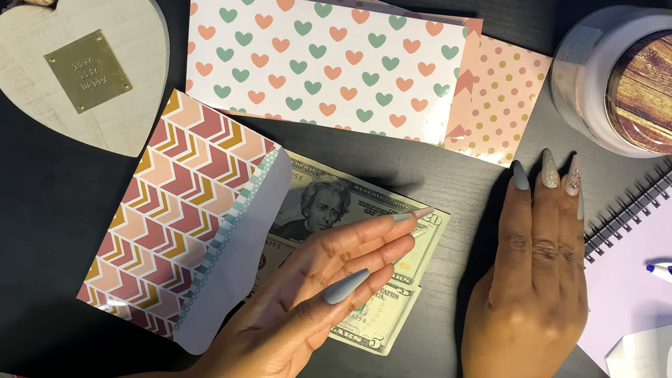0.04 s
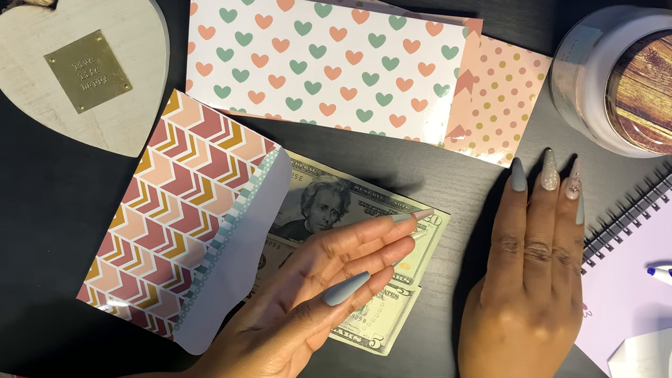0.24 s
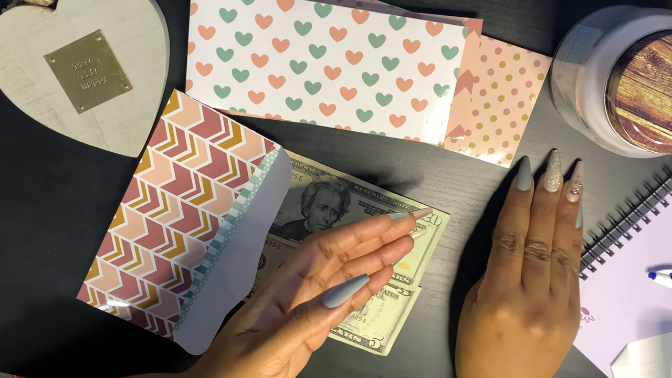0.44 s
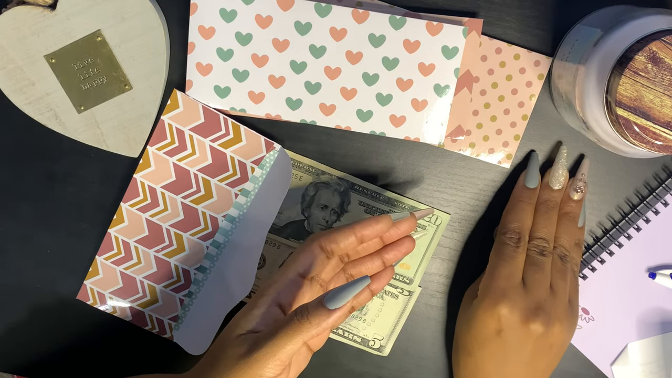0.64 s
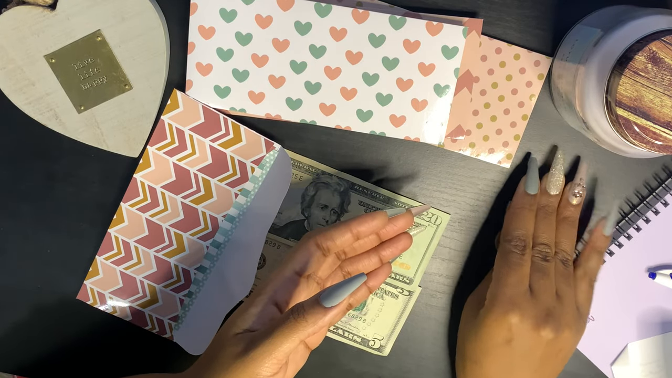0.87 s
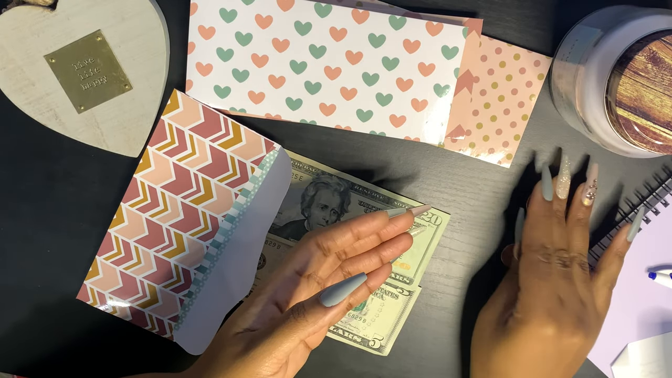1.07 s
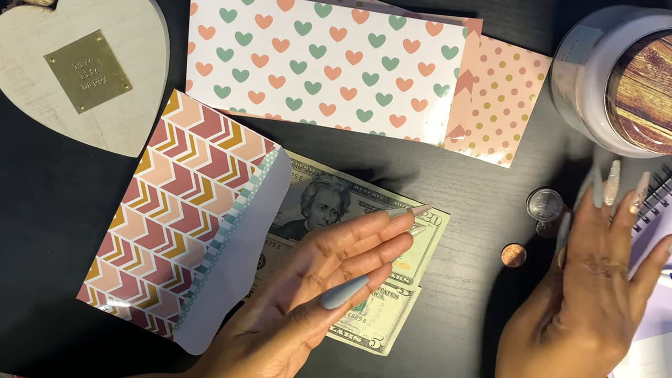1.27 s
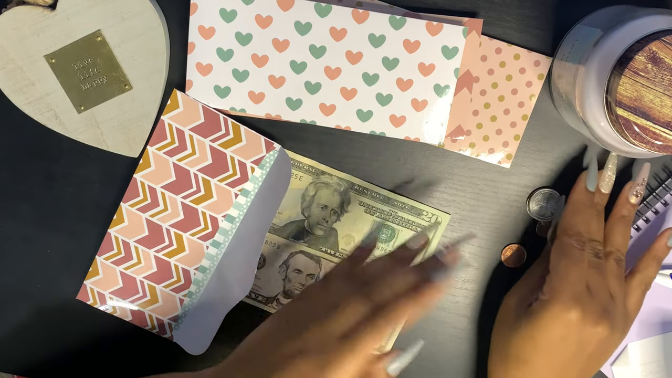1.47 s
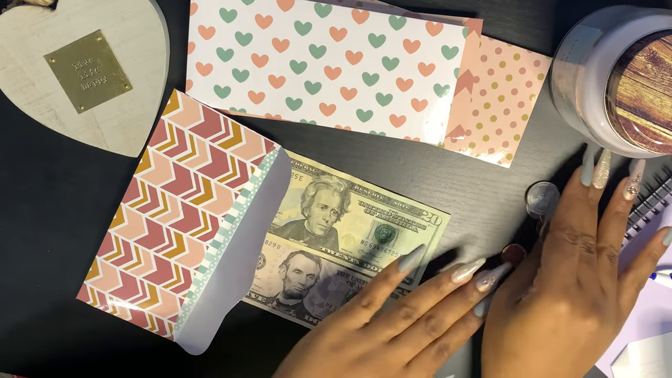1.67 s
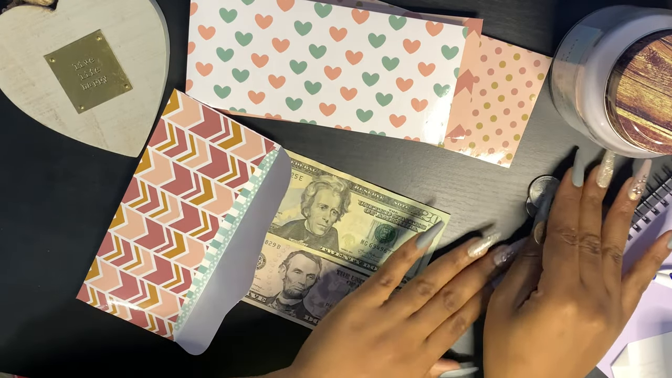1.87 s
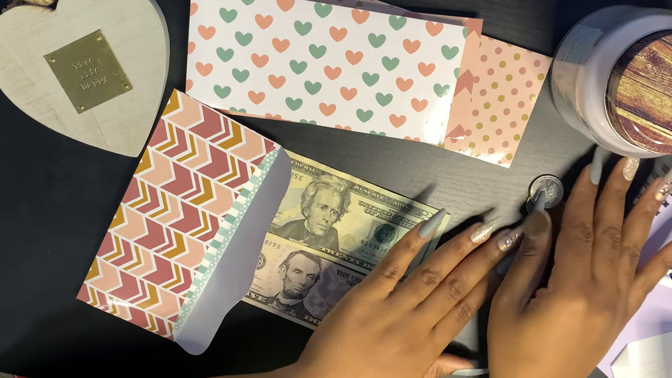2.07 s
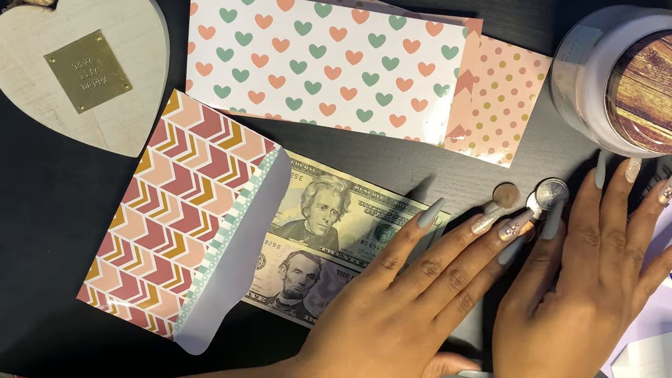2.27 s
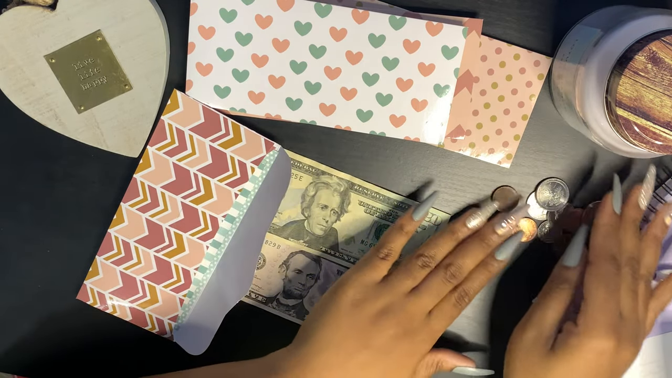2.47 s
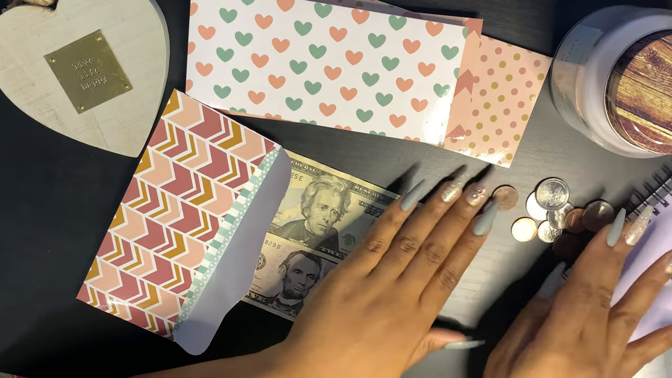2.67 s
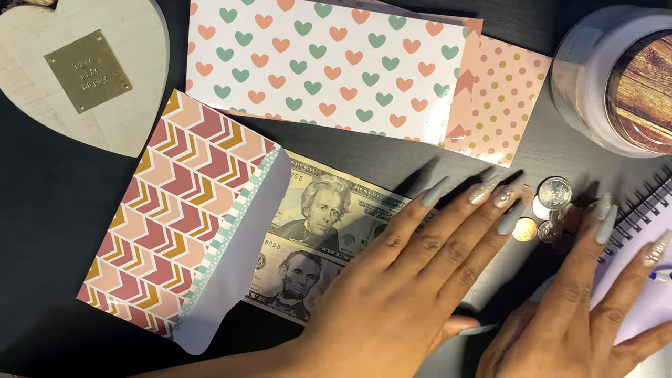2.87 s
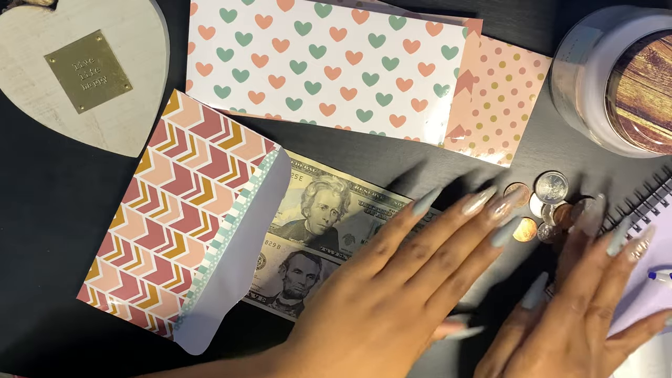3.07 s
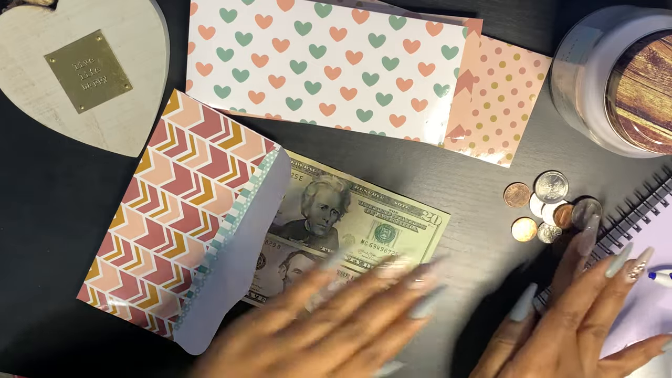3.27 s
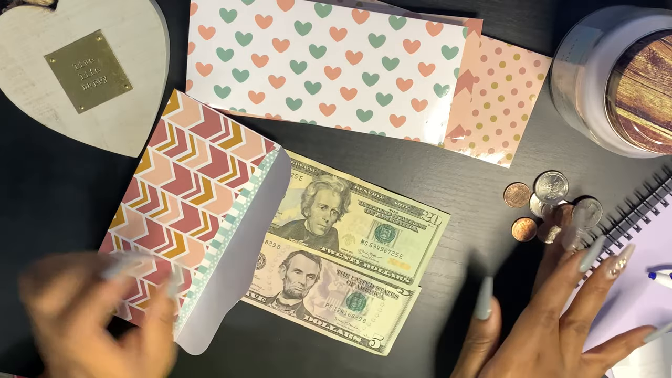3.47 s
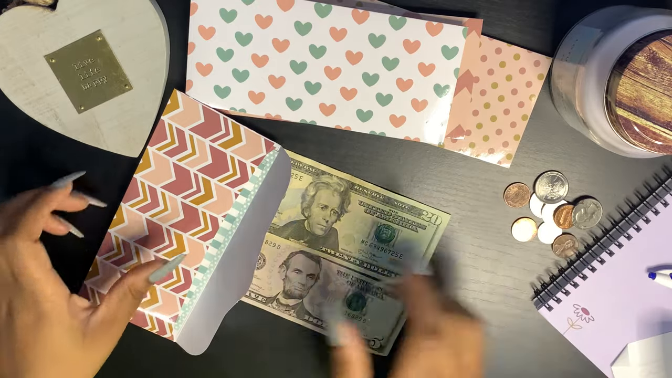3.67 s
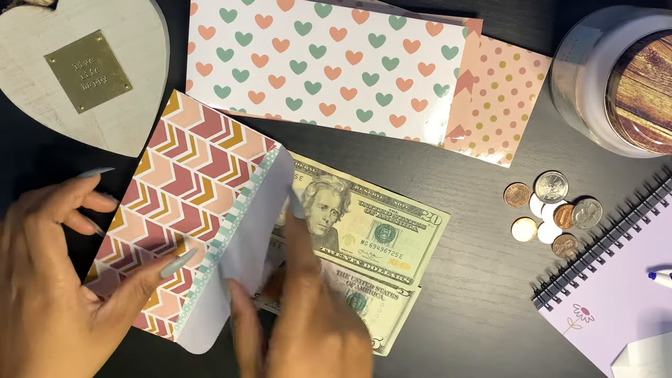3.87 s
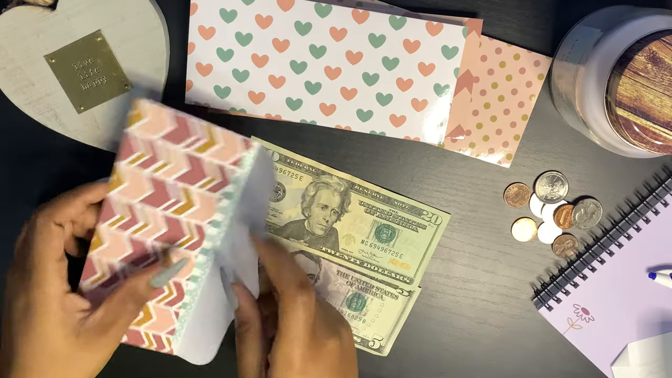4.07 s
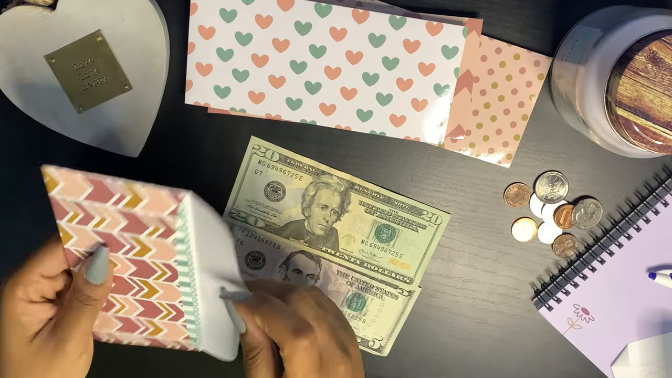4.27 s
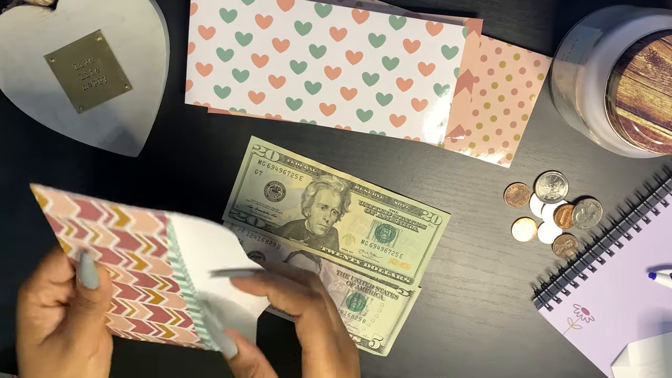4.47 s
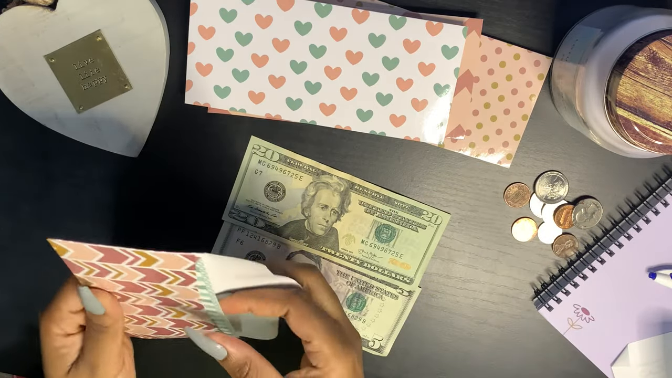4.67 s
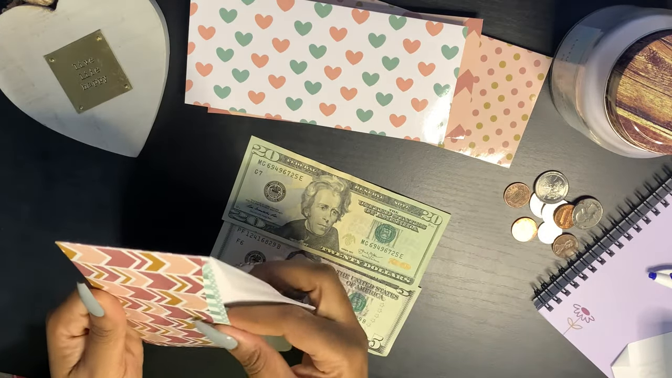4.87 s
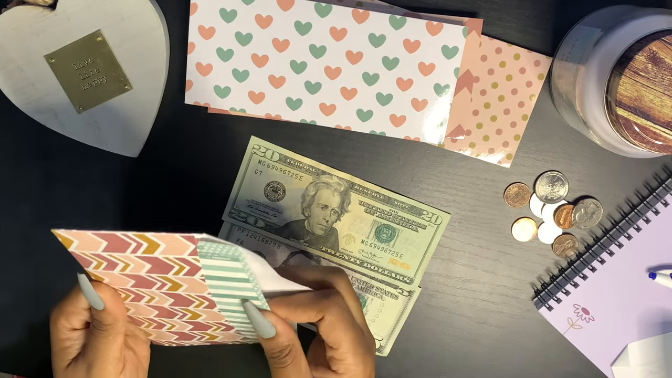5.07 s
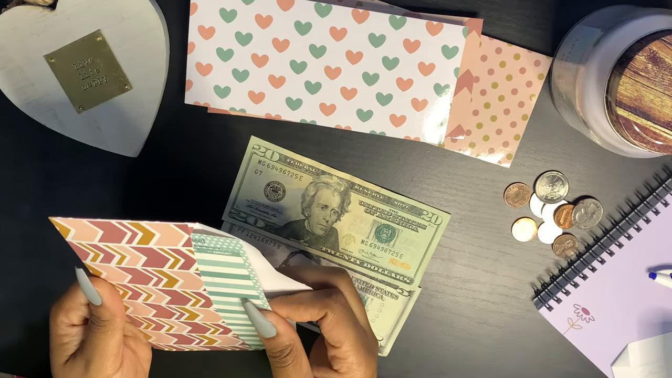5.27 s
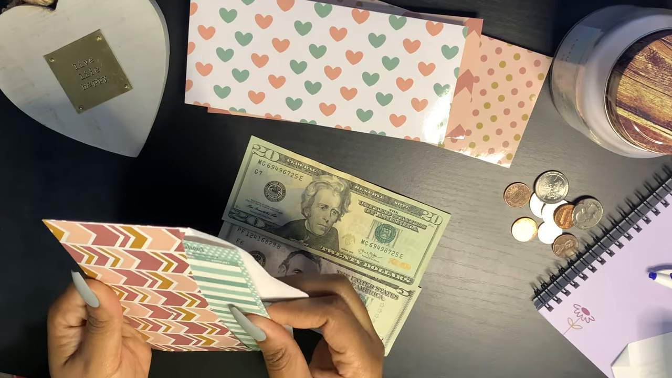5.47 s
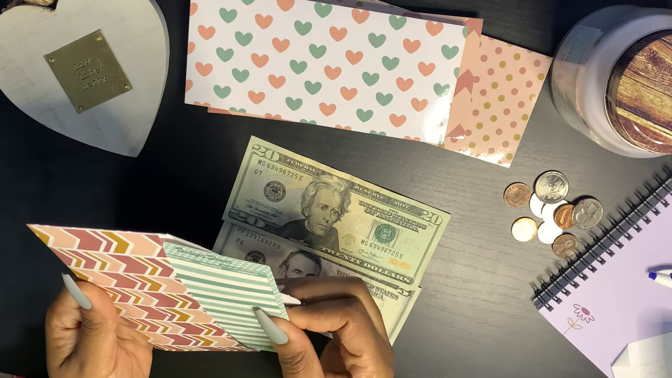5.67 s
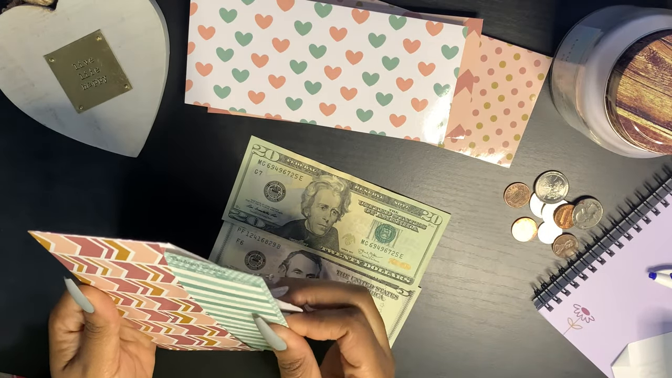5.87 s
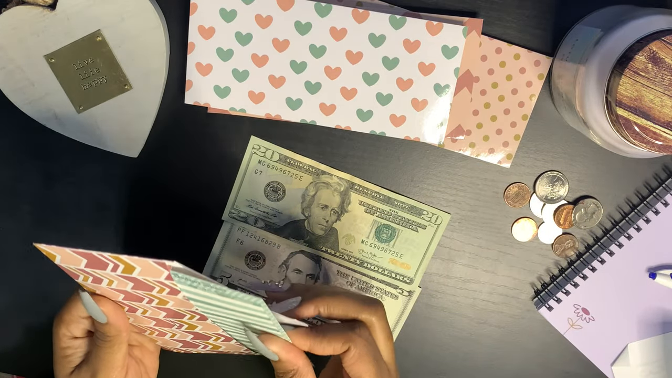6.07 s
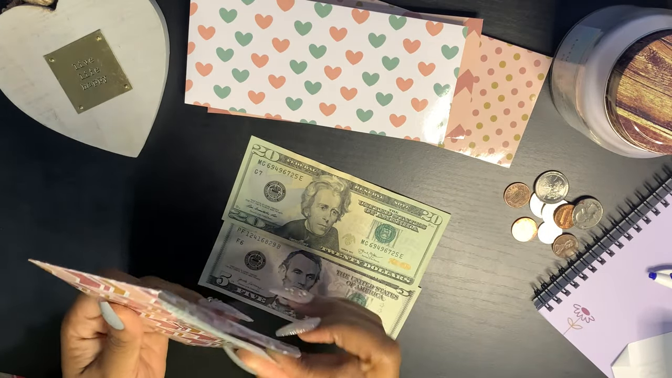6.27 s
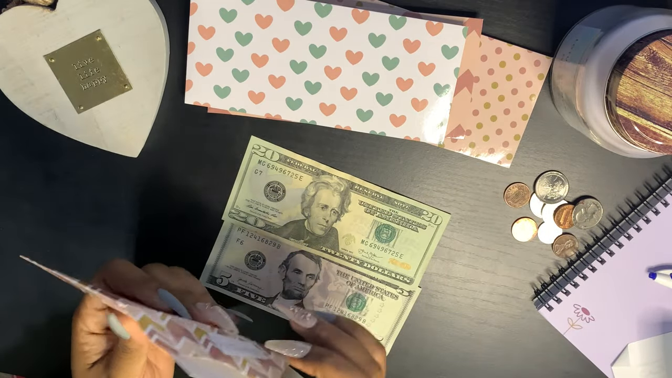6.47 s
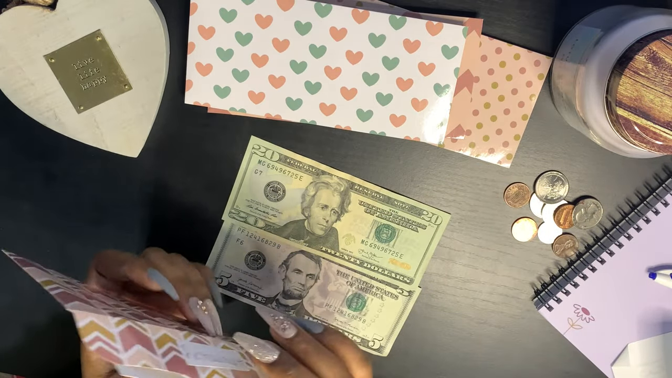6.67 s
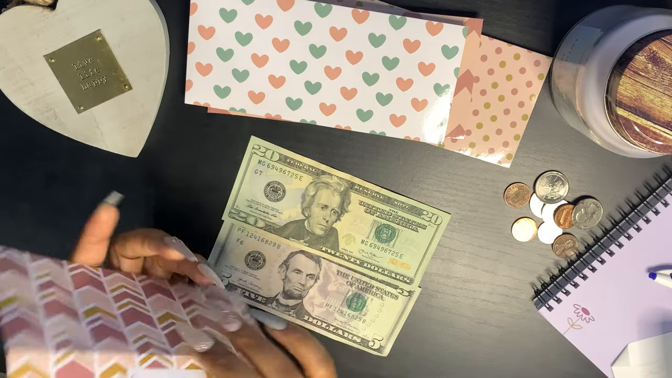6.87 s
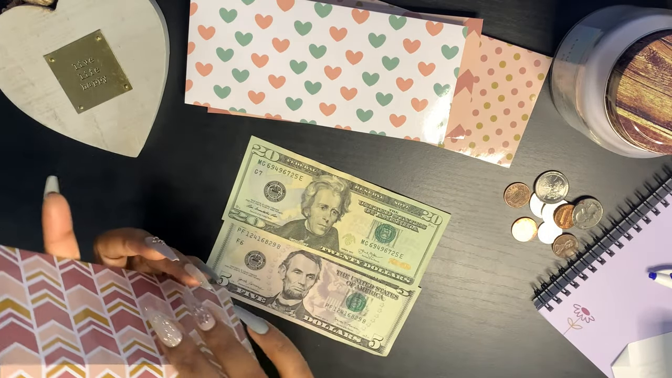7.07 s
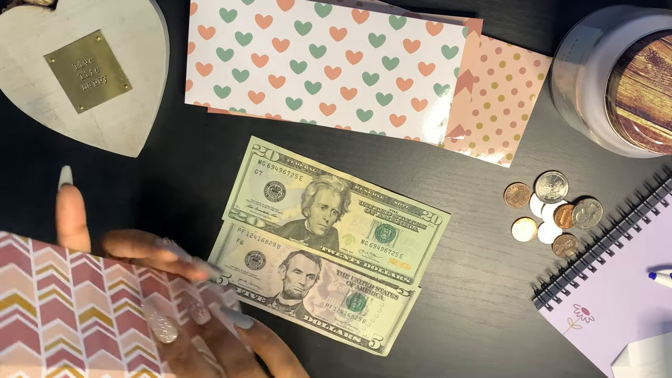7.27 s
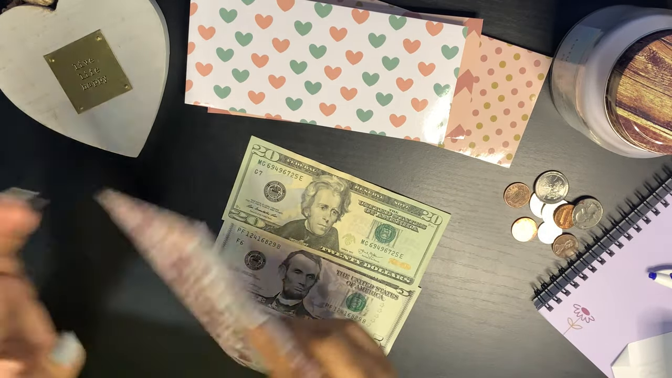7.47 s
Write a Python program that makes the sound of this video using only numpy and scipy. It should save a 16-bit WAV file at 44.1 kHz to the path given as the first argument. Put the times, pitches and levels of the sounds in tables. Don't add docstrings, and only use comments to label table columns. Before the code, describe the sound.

Close above a tabletop in a small quiet room, coins are slapped down with hard woody cracks, then gathered with bright jingling. Flat fingers shove the heap in dull, ratcheting scrapes. After a last small jingle and a short pause, a paper envelope is picked up with a thump, creased, flexed and scratched by a nail, with faint room rumble and hum beneath.

```python
import sys
import numpy as np
from scipy import signal
from scipy.fft import rfft, irfft, next_fast_len
from scipy.io import wavfile
from scipy.ndimage import uniform_filter1d

SR = 44100
rng = np.random.default_rng(int(sys.argv[2]) if len(sys.argv) > 2 else 0)


def decibels_to_gain(level_db):
    exponent = np.asarray(level_db, float) / 20
    return 10 ** exponent


def file_out(sig):
    cols = np.atleast_2d(sig).T
    lim = np.clip(cols, -1, 1)
    pcm = np.round(lim * 32767).astype(np.int16)
    wavfile.write(sys.argv[1], SR, pcm)


N = 332073

# start_s, end_s
HELD_S = (2.235, 2.76)
# start_s, swell_s, scrape_db, fade_db_per_s, metal_db (above the scrape)
SLIDES = [(.236, 0.019, -50, 699.5, 0), (2.754, 0.0025, -46.5, 301, -3), (.193, 0.0026, -60, 168.5, -12),
          (.265, 0.005, -33.5, 225, -19), (.455, 0.0043, -32.5, 268.5, -9.5),
          (.442, 0.0061, -53.5, 599.5, -10.5), (.69, 0.058, -62, 284, -41), (.836, 0.05, -40, 305, 5.5),
          (.92, 0.12, -50, 181, -12), (1.08, 0.086, -57, 327, -7), (1.4125, 0.0036, -50.5, 142.5, 4),
          (1.527, 0.002, -50.5, 80.5, -1), (1.66, 0.067, -46, 60.5, 0), (1.74, 0.12, -45.5, 152, 11),
          (2.0175, 0.013, -47, 165, 5), (2.096, 0.0032, -48.5, 198, -8.5), (2.128, 0.028, -46, 141, 0.5),
          (2.889, 0.0037, -46, 101, -3.5), (2.96, 0.071, -55.5, 266.5, 7.5)]
# start_s, swell_s, scrape_db, fade_db_per_s, metal_db (above the scrape)
SHUFFLES = [
    (2.24, 0.13, -53.5, 60, 0.33),
    (2.358, 0.3, -51.5, 60, 0.27),
]


def ring(x, modes, low_hz=20, high_hz=60000):
    hz = np.fft.rfftfreq(next_fast_len(N), 1 / SR) + 1e-3
    shape = 0
    for k, (mode_hz, width_hz, db) in enumerate(modes):
        shape = shape + (-1) ** k * decibels_to_gain(db) / (1 + 1j * (hz - mode_hz * mode_hz / hz) / width_hz)
    shape /= (1 + 1j * hz / high_hz) ** 6 * (1 - 1j * low_hz / hz) ** 4
    shape /= np.sqrt(np.mean(abs(shape) ** 2))
    return irfft(rfft(x, next_fast_len(N)) * shape)[..., :N]


def grit(spread_db, hold_ms, clump_db, clump_ms):
    hold = max(int(hold_ms * SR / 1000), 1)
    clump = max(int(clump_ms * SR / 1000), 1)
    contacts = np.minimum(rng.exponential(size=N + 1)[:N // hold + 1], 2.6)
    size = decibels_to_gain(spread_db * np.repeat(contacts, hold)[:N])
    crowding = rng.standard_normal(N // 100)[:N // clump + 1]
    crowding = uniform_filter1d(np.repeat(crowding, clump)[:N], clump)
    size = uniform_filter1d(size, hold) * decibels_to_gain(clump_db * crowding)
    return rng.standard_normal((2, N)) * size / np.sqrt(np.mean(size ** 2))


def impact_noise():
    return np.sign(rng.standard_normal((2, N)))


def pushes(times, peak_db, contact_ms):
    force, t = np.zeros(N + SR), np.arange(SR // 10) / SR
    for s, db, ms in zip(times, peak_db, contact_ms):
        u = t / (np.clip(ms, .2, 12) / 1000)
        at = int(s * SR)
        force[at:at + len(t)] += decibels_to_gain(db) * (u * np.exp(1 - u)) ** 2
    return force[:N]


def strokes(rows, db=0., share=0., faster=1.):
    gain, t = np.zeros(N + SR), np.arange(SR) / SR
    for s, swell_s, level_db, fade, *colour_db in rows:
        rise = np.minimum(t / swell_s, 1)
        fall_db = faster * fade * np.maximum(t - swell_s, 0)
        at = int(s * SR)
        gain[at:at + SR] += rise * decibels_to_gain(level_db + db + share * sum(colour_db) - fall_db)
    return gain[:N]


def tones(times, peak_db, hz, t60):
    out, t = np.zeros((2, N + SR)), np.arange(SR // 4) / SR
    onset = 1 - np.exp(-t / 0.00033)
    for s, db, f, fade_s in zip(times, peak_db, hz, t60):
        ringing = np.sin(2 * np.pi * f * t + [[0], [np.pi / 2]]) * decibels_to_gain(-60 * t / fade_s) * onset
        at = int(s * SR)
        out[:, at:at + len(t)] += decibels_to_gain(db) * ringing
    return out[:, :N]


def pings(gain, rate, low_hz, high_hz, t60):
    out, t = np.zeros((2, N + SR)), np.arange(SR // 50) / SR
    fade = decibels_to_gain(-60 * t / t60) * (1 - np.exp(-t / 0.00015))
    for place, pitch, size, phase in rng.random((4000, 4))[:int(rate * N / SR)]:
        at = int(place * N)
        hz = low_hz * (high_hz / low_hz) ** pitch
        wave = np.sin(2 * np.pi * (hz * t + phase * np.array([[0], [1]])))
        out[:, at:at + len(t)] += gain[at] * (0.88 + size) * fade * wave
    return out[:, :N] / np.sqrt(rate * t60 / 14)


def waver(x, chance):
    rock_ms, rocks_per_s = .25, 40
    k = int(SR / rocks_per_s)
    path = uniform_filter1d(uniform_filter1d(chance, k), k)
    place = np.arange(N) + path / np.std(path) * rock_ms * SR / 1000
    return np.array([np.interp(place, np.arange(N), row) for row in x])


def air():
    # pitch_hz, level_db (per Hz)
    rumble_curve = [(25, -19), (43, -12), (124, -6.5), (334, -24.5), (1440, -30), (7000, -47), (9100, -87),
                    (15400, -120)]
    # pitch_hz, level_db (rms)
    mains_lines = [(60, -80), (120, -82)]
    # pitch_hz, width_hz, level_db (rms)
    fan_whine = [(1480, 21, -88)]
    rumble_db, rumble_wander_db, hiss_db = -71, 1.6, -85.5
    hz, t = np.fft.rfftfreq(N, 1 / SR) + 1, np.arange(N) / SR
    curve_hz, curve_db = np.transpose(rumble_curve)
    colour = decibels_to_gain(np.interp(np.log(hz), np.log(curve_hz), curve_db))
    rumble = irfft(rfft(rng.standard_normal((2, N))) * colour, N)
    rumble /= np.sqrt(np.mean(rumble ** 2))
    hold = 4410
    wander = uniform_filter1d(np.repeat(rng.standard_normal(N // hold + 1), hold)[:N], hold)
    hum = 0
    for line_hz, db in mains_lines:
        hum = hum + decibels_to_gain(db + 6.0 + 1.7 * wander) * np.sin(2 * np.pi * line_hz * t)
    hum += decibels_to_gain(fan_whine[0][2] + 4.0 * wander[::-1]) * ring(rng.standard_normal(N), fan_whine)
    hiss = ring(rng.standard_normal((2, N)), [(8100, 3500, 0)], high_hz=30000)
    hiss *= decibels_to_gain(hiss_db + 1.8 * wander[::-1])
    return rumble * decibels_to_gain(rumble_db + rumble_wander_db * wander) + hum * [[1], [0]] + hiss


def room(x):
    # pitch_hz, t60_s, level_db
    reverb_bands = [(300, 0.3, -24), (1300, 0.18, -8.5), (3400, 0.11, -7.5), (11000, 0.28, -29.5)]
    t = np.arange(SR // 2) / SR
    noise = rng.standard_normal((2, N))
    tail = 0
    for hz, t60, db in reverb_bands:
        decay = decibels_to_gain(-60 * t / t60) * (1 - np.exp(-t / 0.0021))
        decay /= np.sqrt(np.sum(decay ** 2))
        band = ring(noise, [(hz, hz, 0)])[:, :len(t)] * np.sqrt(hz / 9000)
        tail = tail + decibels_to_gain(db) * band * decay
    return signal.fftconvolve(x, tail, axes=1)[:, :N]


def nail_draws(rub):
    # start_s, swell_s, level_db, fade_db_per_s, squeak_db (above the scrape)
    draw_strokes = [
        (6.055, .02, -72, 17, -19.5),
        (6.4, 0.046, -53.5, 153, -11.5),
        (6.48, 0.017, -59.5, 120, 0.5),
        (6.56, 0.11, -55.5, 200, -7),
        (6.7, 0.061, -56, 304, 0),
        (7.116, 0.0037, -57, 200, -5),
    ]
    # pitch_hz, width_hz, level_db
    scrape_modes = [(2867, 164, 0), (1600, 460, -15.5)]
    squeak_modes = [(5550, 1200, -0.076), (6760, 180, -0.29), (4120, 1300, -1.4)]
    scrape = ring(strokes(draw_strokes) * rub, scrape_modes, low_hz=494)
    return scrape + ring(strokes(draw_strokes, share=0.92) * rub, squeak_modes, low_hz=2000)


def thumps_and_pops():
    # start_s, peak_db, pitch_hz, t60_s
    pocket_thumps = [
        (3.73, -51, 220, 0.072),
        (3.776, -51, 235, 0.17),
        (3.953, -35.5, 300, 0.12),
        (3.979, -53, 300, 0.046),
        (6.059, -44, 424, 0.059),
        (6.19, -42, 400, 0.094),
    ]
    # start_s, peak_db, pitch_hz, t60_s
    wrist_knocks = [
        (2.632, -48.5, 110.5, 0.26),
        (7.266, -46, 105, 0.11),
    ]
    # start_s, peak_db, pitch_hz, t60_s
    fold_pops = [(4.097, -49, 4520, .015), (4.213, -42, 4500, .01), (4.142, -50, 1410, 0.036),
                 (4.148, -47, 1550, 0.032), (4.174, -53, 450, 0.026), (4.198, -49, 7160, .015),
                 (4.2268, -45, 520, 0.037), (4.2425, -38, 634, 0.011), (4.258, -37, 1700, 0.0089),
                 (4.264, -43, 523, 0.011), (4.345, -53, 923, 0.017), (4.889, -59, 830, 0.039),
                 (5.04, -50, 2020, 0.01), (6.193, -50.5, 1500, 0.021), (6.436, -48, 2870, 0.024),
                 (6.446, -52, 2880, 0.018), (6.654, -45.5, 1720, 0.056), (7.056, -49, 1400, 0.033),
                 (7.116, -39.5, 4420, 0.024), (7.141, -45, 1500, 0.053), (7.166, -41, 3470, .015),
                 (7.221, -44, 1520, 0.025), (7.261, -30, 3900, 0.0084), (7.263, -39, 220, 0.035),
                 (7.473, -41, 387, 0.04)]
    return tones(*np.transpose(pocket_thumps + wrist_knocks + fold_pops))


def paper_snaps():
    # start_s, peak_db, thud_db (above the peak), pitch_hz
    nail_taps = [(3.95, -24.5, 4, 1770), (4.001, -47, -25, 2600), (4.0119, -34, -26, 1600),
                 (4.3878, -59, 12, 1500), (5.865, -58, 10, 2400), (5.964, -68, -21, 3140),
                 (6.0532, -42.5, -8, 2900), (6.188, -53.5, 27.5, 1300), (6.283, -56, -24, 2770),
                 (6.759, -34, 4.5, 1480), (6.8494, -41, 8, 1480), (7.093, -46, 9, 1480),
                 (7.1671, -37.5, -29, 1100), (7.261, -29, -8, 4350), (7.482, -40, 13, 1690)]
    # start_s, peak_db, sizzle_db (above the peak), pitch_hz
    crisp_creases = [(3.7232, -57, -9, 3050), (3.7669, -74.5, 19, 1175), (3.8078, -50, -2, 2300),
                     (3.9104, -45.5, -12, 1800), (3.9958, -33.5, -21, 2620), (4.0424, -44, -15, 1630),
                     (4.1982, -45.5, -10, 1570), (4.2138, -42.5, -13, 1340), (4.2267, -39.5, -5, 2560),
                     (4.3445, -69, -11, 2000), (5.036, -39.5, -25, 2514), (5.435, -63, -6, 4800),
                     (5.543, -50, -16, 2900), (7.2607, -37, -5.5, 5400), (4.5854, -52, 6, 1380),
                     (4.724, -48, -9, 1280), (6.505, -38.5, -7, 2935), (7.471, -38, -7, 2350)]
    tap_sizzle_db, crease_thud_db = -65, -17
    snaps = [(s, db, thud_db, tap_sizzle_db, hz) for s, db, thud_db, hz in nail_taps]
    snaps += [(s, db, crease_thud_db, sizzle_db, hz) for s, db, sizzle_db, hz in crisp_creases]
    s, db, thud_db, sizzle_db, hz = np.transpose(snaps)
    ms = 0.85 * decibels_to_gain(-0.45 * (db + 50.5))
    return s, db, thud_db, sizzle_db, hz, ms


def paper():
    # start_s, swell_s, rustle_db, fade_db_per_s, sizzle_db (above the rustle)
    paper_rubs = [(3.725, 0.052, -69, 156.5, 1), (3.804, 0.0087, -61, 28, -7),
                  (3.945, 0.0046, -60, 80, -37), (4.135, 0.11, -60.5, 168, -7),
                  (4.425, 0.027, -62.5, 113, 0), (4.48, 0.21, -60, 291, -9.5), (4.714, 0.012, -55, 362, 3),
                  (4.84, 0.083, -58.5, 96.5, 1), (4.95, 0.05, -66.5, 298, 7.5),
                  (5.05, 0.096, -76, 349.5, -2.5), (5.36, 0.07, -71.5, 105, -5),
                  (5.47, 0.11, -59, 224, -6.5), (5.78, 0.11, -73, 17, -8), (6.05, 0.31, -72.5, 26, -15),
                  (6.385, 0.067, -55, 66, -11), (6.5, 0.2, -60, 296, -2), (6.7, 0.049, -48, 248, -1),
                  (6.826, 0.027, -54.5, 92, -12.5), (7.02, 0.031, -60.5, 95, -36.5),
                  (7.09, 0.0021, -61, 200, -17), (7.112, 0.031, -49.5, 144.5, -6),
                  (7.259, 0.0027, -59.5, 92, -5), (7.42, 0.056, -54.5, 279, -1)]
    # start_s, swell_s, level_db, fade_db_per_s
    flex_strokes = [
        (3.74, 0.13, -60.5, 200),
        (3.95, 0.009, -45.5, 249),
        (4.12, 0.091, -60, 80),
        (4.714, 0.0066, -56.5, 402),
        (5.8, 0.3, -69.5, 56),
        (6.36, 0.11, -67, 31),
        (7.02, 0.21, -61, 192.5),
        (7.25, 0.01, -53.5, 597),
        (7.43, 0.068, -58, 443),
    ]
    # pitch_hz, width_hz, level_db
    sheet_modes = [(1386, 152, 17.1), (2600, 200, 1.7), (5200, 360, 0.94), (2900, 4160, 9.5)]
    flap_modes = [(235, 160, -13.5), (400, 74, 6.5), (568, 4700, -2)]
    sizzle_modes = [(9900, 29000, 1)]
    s, db, thud_db, sizzle_db, hz, ms = paper_snaps()
    rustle = strokes(paper_rubs, db=-3.13)
    sizzle = strokes(paper_rubs, db=2.7, share=0.77, faster=1.6)
    flap = strokes(flex_strokes) + decibels_to_gain(-15.0) * rustle
    rub = grit(spread_db=1.0, hold_ms=2.1, clump_db=3.5, clump_ms=20)
    white = impact_noise()
    sheet = ring(pushes(s, db - 3.5, ms) * white + rustle * rub, sheet_modes, low_hz=365, high_hz=18000)
    thuds = pushes(s + 0.002, db + thud_db - 16.5, 2.2 * ms)
    body = ring(thuds * white + flap * rub, flap_modes, low_hz=60, high_hz=2150)
    ticks = pushes(s, db + sizzle_db + 11.5, 0.29 * ms)
    crisp = ring(ticks * white + sizzle * rub, sizzle_modes, low_hz=3590, high_hz=19000)
    nail = nail_draws(rub)
    buckles = pings(rustle * decibels_to_gain(-1.0), rate=450, low_hz=1100, high_hz=5186, t60=0.023)
    snap_tones = tones(s, db + 6.5, hz, np.full(len(s), .008))
    return waver(sheet + nail, white[1]) + body + crisp + buckles + snap_tones + thumps_and_pops()


def lurches(db, share=0.):
    # peak_s (middle of the bell), peak_db, rim_db
    heap_lurches = [
        (2.244, -38, -4),
        (2.312, -41.5, 5),
        (2.378, -43, -2),
        (2.436, -41, -1),
        (2.495, -37, -2),
        (2.555, -39.5, 2),
        (2.612, -40, -25),
        (2.66, -36.5, -4),
        (2.715, -40.5, -2),
    ]
    lurch_ms = 9.8
    t = np.arange(N) / SR
    gain = 0
    for s, peak_db, rim_db in heap_lurches:
        gain = gain + decibels_to_gain(peak_db + db + share * rim_db) * np.exp(-((t - s) / lurch_ms * 1000) ** 2)
    return gain


def coin_blows():
    # start_s, peak_db, board_db, metal_db, contact_ms
    struck_blows = [(0.0148, -36.5, -21, -17.5, 1.16), (0.1945, -38.5, -14.5, -11, 0.79),
                    (0.2556, -32, -15, 6, 2.46), (0.2654, -10, -3, -23.5, 0.81),
                    (0.2727, -22.5, -21, -28, 1.2), (0.3, -33.5, -3.5, 1, 0.91),
                    (0.347, -30.5, 6.5, -23, 1.25), (0.4584, -11, -4, -9, 0.85),
                    (0.8488, -30.5, -4, -7.5, 0.74), (0.8797, -29, -1.5, -3.5, 4.3),
                    (0.973, -31, -13, -19.5, 1.5), (0.9954, -35, -9, -12, 0.68), (1.0305, -40, 3.5, -7, 3.3),
                    (1.1452, -41, -15, -1.5, 1.3),
                    (1.4131, -33, -9.5, -5, 1.2), (1.4411, -39, 3.5, -3, 1.7),
                     (1.517, -31.5, -0.5, -29, 1.43), (1.5606, -41.5, -29.5, -0.5, 1.5),
                     (1.702, -33, -6, -2.5, 4), (1.8111, -33, -1.5, 1, 2.1),
                     (1.8219, -33.5, -1.5, 6.5, 1.9), (1.852, -33, -8, 11.5, 0.84),
                     (1.8756, -44.5, 10.5, 2, 0.72), (1.9049, -28.5, -6.5, 3.5, .8),
                     (2.019, -23.5, -6, -1.5, 0.66), (2.0895, -32.5, -16.5, 0, 1.9),
                     (2.094, -18, -2, -4, 0.9), (2.106, -27.5, -5.5, -1, 1.2),
                     (2.128, -20.5, -7.5, -2.5, 1.1), (2.216, -34.5, -20, -5, 3.7),
                     (2.7489, -33.5, -10.5, 8.5, 1.87), (2.8906, -32.5, -15, -3, 1.2),
                     (2.897, -33, -14, -4, 2.2), (3.0135, -29, -2, 1, 1.04), (3.1198, -45, 0.5, 3, 2.1),
                     (3.161, -60, -14, 10.5, 0.71)]
    # start_s, peak_db,
    # board_db, metal_db
    skid_blows = [
        (0, -54, -5.5, -34),
        (0.7282, -66.5, 23, -14),
        (1.7215, -32.5, -12, 1),
        (1.7438, -46, -18.5, 6.5),
        (1.7865, -37, -8.5, -13.5),
        (2.0414, -53, -10, 7.5),
        (2.1507, -39.5, -33, 7.5),
    ]
    skid_ms = 7.5
    struck = struck_blows
    rows = struck + [row + (skid_ms,) for row in skid_blows]
    return (*np.transpose(rows), np.arange(len(rows)) < len(struck))


def board_thump(blows, rub, white):
    # pitch_hz, width_hz, level_db
    board_modes = [(89, 22, -13), (214, 52, -7), (339.4, 17, -1), (429, 39, 0.5), (619, 13, -2),
                   (721, 29, 2), (846, 27, -1.5), (930, 77, -3), (1013, 36, 1), (1133, 150, -4)]
    tabletop_modes = [(210, 54, -2), (356, 17, -7), (400, 33, -5), (686, 25, -4), (840, 54, -2.5),
                      (920, 24, -4), (970, 17, 4), (1310, 25, -8.5), (1390, 69, -6), (1690, 100, 0)]
    palm_modes = [(330, 7.9, -1), (403, 21, -4), (640, 140, -7.5)]
    boom_modes = [(217, 32, 7.5), (105, 45, -15)]
    # start_s, swell_s, level_db, fade_db_per_s, boom_db (above it)
    palm_drags = [(0, 0.008, -76.5, 151.5, 15.5), (.7, 0.032, -54.5, 193.5, -31),
                  (1.1, 0.06, -71, 157, -16.5), (1.415, 0.024, -52, 96, -5), (1.7, 0.016, -43, 99, 3.5),
                  (1.79, 0.036, -45.5, 176, 4), (2.02, 0.011, -56, 144.5, 7), (2.098, 0.011, -44.5, 296, 3),
                  (2.13, .01, -55, 251, -10.5), (2.24, 0.14, -78.5, 52, 1.5), (2.45, 0.16, -61, 143, -33),
                  (2.9, .02, -74, 98, -8)]
    s, db, board_db, _, ms, struck = blows
    rumble = strokes(SLIDES, db=0.0, share=0.034) + strokes(SHUFFLES, db=-5.0)
    force = pushes(s + 0.0021, db + board_db - 8.0, 1.5 * ms) + lurches(db=-14.5) + rumble
    board = ring(force * white, board_modes, high_hz=3030)
    punch = pushes(s[struck], (db + board_db)[struck] - 8, np.full(struck.sum(), 0.2))
    board += ring(punch, tabletop_modes, low_hz=111.7) * [[1], [0]]
    board[1] += 0.11 * signal.hilbert(board[0], next_fast_len(N)).imag[:N]
    board += ring(strokes(palm_drags) * rub, palm_modes, high_hz=3000)
    return board + ring(strokes(palm_drags, share=0.4) * rub, boom_modes, high_hz=1500)


def contact_crack(blows, rub, white):
    # pitch_hz, width_hz, level_db
    crack_modes = [(1138, 260, 3.4), (1420, 110, 0.44), (1690, 110, 15.3), (2167, 720, 3.6), (2017, 200, 8),
                   (1800, 4450, 3.7)]
    s, db, _, _, ms, _ = blows
    force = pushes(s, db - 4.0, 1.18 * ms) + lurches(db=-10.5)
    scrape = strokes(SLIDES + SHUFFLES, db=0.5)
    return ring(force * white + scrape * rub, crack_modes, low_hz=626, high_hz=5040)


def pressed_heap(s, metal_db, ms, rub, white):
    # pitch_hz, width_hz, level_db
    muffled_modes = [(9770, 440, -2.5), (11000, 500, 0), (8260, 490, 6)]
    heap_modes = [(2022, 67, 18.8), (4420, 190, 6.6), (3610, 37, 14.6), (4500, 9780, 4)]
    rim_modes = [(13000, 190, 0)]
    # start_s, peak_db
    edge_trips = [
        (2.3116, -44.5),
        (2.4343, -49),
        (2.4917, -42),
        (2.5525, -53),
        (2.564, -43),
        (2.604, -42),
        (2.6125, -38),
        (2.6553, -34),
    ]
    fingers_hz = 11150
    trips = pushes(*np.transpose(edge_trips), np.full(len(edge_trips), 0.64))
    face_force = pushes(s, metal_db + 0.5, ms) + lurches(db=-43.0) + decibels_to_gain(3) * trips
    faces = face_force * white + strokes(SHUFFLES, db=-30) * rub
    dull = ring(faces, muffled_modes, low_hz=4270, high_hz=17500)
    stack_force = pushes(s, metal_db, 0.84 * ms) + lurches(db=2.5) + trips
    stack = stack_force * white + strokes(SHUFFLES, share=0.6) * rub
    dull += ring(stack, heap_modes, low_hz=1240, high_hz=11540)
    shade = signal.cheby2(8, 40, fingers_hz * 1.1, fs=SR, output="sos")
    dull = signal.sosfilt(shade, dull)
    whistle = lurches(db=-29, share=0.81) + strokes(SHUFFLES, db=-44) + decibels_to_gain(-22) * trips
    return dull + ring(ring(whistle * rub, rim_modes), rim_modes)


def coin_edges(s, metal_db, ms, rub, white):
    # pitch_hz, width_hz, level_db
    bite_modes = [(3292, 64, 5), (3570, 390, -7), (4420, 170, 3.5), (7374, 448, 20), (7380, 366, 19.5),
                  (5135, 36000, -2.5)]
    grind = strokes(SLIDES, db=0.5, share=0.47, faster=0.88)
    return ring(pushes(s, metal_db - 1, ms) * white + grind * rub, bite_modes, low_hz=1500, high_hz=7580)


def coin_faces(s, metal_db, ms, rub, white):
    # pitch_hz, width_hz, level_db
    face_modes = [(9540, 660, 9), (11600, 1600, -6.5), (12180, 70, -0.5), (12830, 45, 1), (14700, 80, -4.5),
                  (15300, 28, 1), (12000, 10000, 10)]
    shiver_modes = [(15250, 30, 0), (15315, 30, -1), (14700, 120, -7), (15560, 160, -6)]
    # start_s, swell_s, level_db, fade_db_per_s
    shiver_strokes = [
        (1.415, 0.011, -52, 197.5),
        (1.71, .03, -42.5, 85),
        (1.79, 0.032, -39.5, 150),
        (2.019, 0.018, -45, 200),
        (2.1, 0.026, -45, 159.5),
        (2.76, .006, -64, 303),
        (2.89, .006, -58, 200),
        (3.013, .005, -54, 306),
    ]
    press, release = HELD_S
    free = np.interp(np.arange(N) / SR, [press, press + .05, release, release + .001], [1, 0, 0, 1])
    jingle = strokes(SLIDES, db=2.0, share=1.0, faster=1.3) * free
    force = pushes(s, metal_db + 3, 1.61 * ms)
    bright = ring(force * white + jingle * rub, face_modes, low_hz=4350, high_hz=37300)
    return bright + ring(strokes(shiver_strokes) * free * rub, shiver_modes, low_hz=9060)


def chinks():
    # start_s, peak_db, pitch_hz, t60_s
    coin_chinks = [(0.0178, -40, 1800, .05), (0.2658, -18, 1500, .014), (.2668, -19, 850, .02),
                   (.884, -28, 15300, .04), (1.034, -37, 15400, .04), (0.85, -25.5, 11550, .008),
                   (0.4595, -19.5, 4350, 0.0095), (0.4591, -19, 6880, 0.0083), (1.729, -26, 14700, 0.035),
                   (1.7465, -26, 15300, 0.045), (1.796, -33, 15300, .02), (1.811, -28, 15100, 0.026),
                   (1.8245, -31, 15300, .03), (1.8525, -29, 3600, .012), (2.0953, -15.5, 4420, .009),
                   (2.0958, -20, 6070, 0.0076), (2.1285, -17.5, 9500, 0.0058),
                   (2.1296, -22.5, 6060, 0.0069), (2.7502, -21, 4550, 0.0079),
                   (1.8528, -22.5, 15300, 0.049), (1.9056, -25, 15300, 0.0067),
                   (2.084, -26.5, 11000, 0.012), (2.1204, -15.5, 9260, 0.0056), (2.89, -41, 15300, 0.022),
                   (3.014, -31, 15300, 0.022)]
    # start_s, peak_db, pitch_hz, t60_s
    singing_coins = [
        (1.036, -56, 9300, 0.22),
        (1.679, -47, 9340, 0.6),
        (1.722, -39.5, 9430, 0.3),
        (1.813, -32, 12830, 0.12),
        (1.72, -34.5, 12250, .1),
        (2.143, -50, 12900, 0.14),
        (2.768, -38.5, 13000, 0.054),
    ]
    s, db, hz, t60 = np.transpose(coin_chinks + singing_coins)
    return tones(s, db + 4.0, hz, t60)


def coins():
    blows = coin_blows()
    s, db, _, metal_above_db, ms, _ = blows
    metal_db = db + metal_above_db
    rub = grit(spread_db=4.0, hold_ms=1.8, clump_db=3.5, clump_ms=14)
    white = impact_noise()
    held = (s > HELD_S[0]) & (s < HELD_S[1])
    loose = ~held
    cupped = (s > 1.8) & (s < HELD_S[0])
    edge_db, face_db = metal_db + 3 * cupped, metal_db - 8.5 * cupped
    crack = contact_crack(blows, rub, white)
    bite = coin_edges(s[loose], edge_db[loose], ms[loose], rub, white)
    bright = coin_faces(s[loose], face_db[loose], ms[loose], rub, white)
    dull = pressed_heap(s[held], metal_db[held], ms[held], rub, white)
    return waver(crack + bite, white[1]) + board_thump(blows, rub, white) + bright + dull


def ports(x, lead_ms):
    # pitch_hz, likeness (0-1)
    port_likeness = [(30, .86), (125, .97), (280, .975), (450, .8), (700, .55), (2500, .6), (5500, .3),
                     (6800, .8), (8000, .993), (16000, .985)]
    # pitch_hz, level_db
    left_lean = [(100, 2.5), (200, 0.5), (600, 2), (1200, 2), (2500, 0.5), (5500, -3), (7500, 0)]
    port_lag_ms, shared_hz = .2, 6000
    hz = np.fft.rfftfreq(next_fast_len(N), 1 / SR) + 1

    def on_hz(curve):
        curve_hz, value = np.transpose(curve)
        return np.interp(np.log(hz), np.log(curve_hz), value)

    like = on_hz(port_likeness)
    treble = .5 + .5 * np.tanh((hz - shared_hz + 600) / 500)
    lead = -lead_ms * hz ** 2 / (hz + 400) * (1 - treble)
    lag = port_lag_ms * (hz - shared_hz) * treble
    cycles = (lead + lag) / 1000
    tilt = decibels_to_gain(on_hz(left_lean) / 2) * np.exp(-1j * np.pi * cycles)
    shared, apart = rfft(x, next_fast_len(N)) * np.sqrt([(1 + like) / 2, (1 - like) / 2])
    return irfft([(shared + apart) * tilt, (shared - apart) / tilt])[:, :N]


def scene():
    metal, sheets = coins(), paper()
    direct = ports(metal + chinks(), lead_ms=0.22) + ports(sheets, lead_ms=0.04)
    return direct + ports(room(metal + decibels_to_gain(-1) * sheets) + air(), lead_ms=0)


def low_pass(x):
    return signal.sosfilt(signal.butter(12, 17170, fs=SR, output="sos"), x)


def record(dry):
    top_cut = signal.ellip(8, .3, 40, 15750, fs=SR, output="sos")
    return low_pass(signal.sosfilt(top_cut, dry))


dry = scene()
out = record(dry)
file_out(out)
```